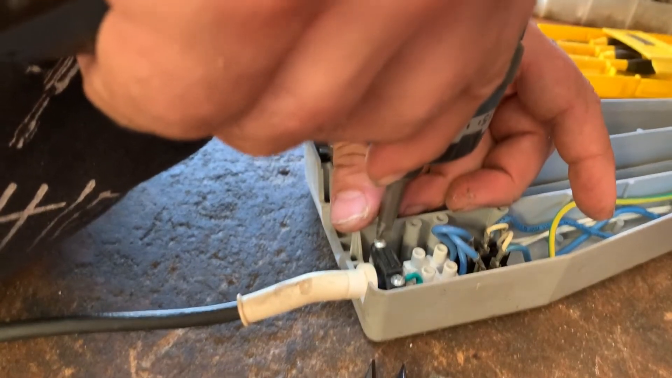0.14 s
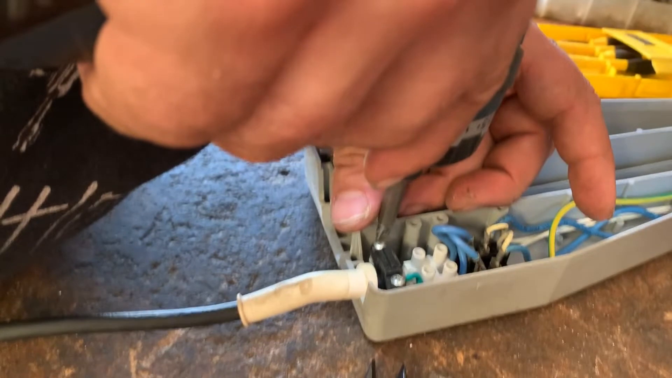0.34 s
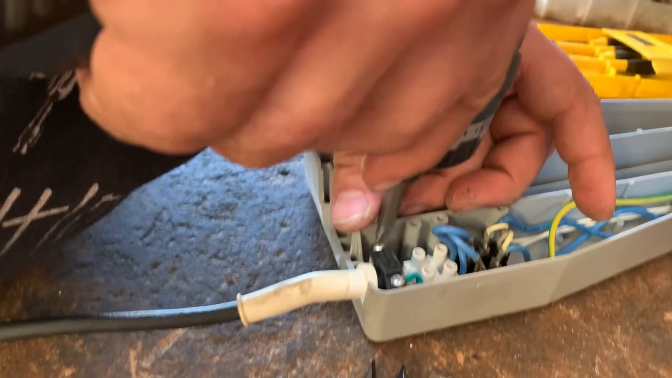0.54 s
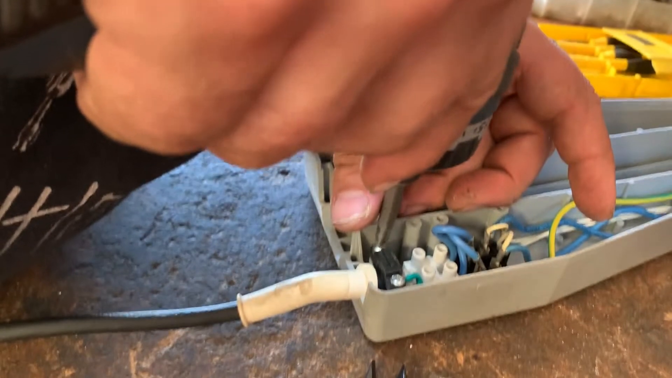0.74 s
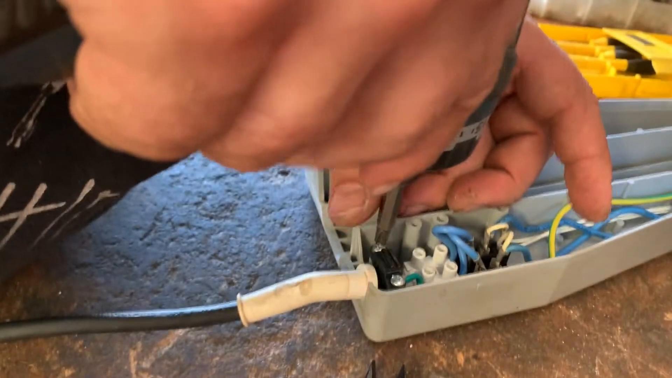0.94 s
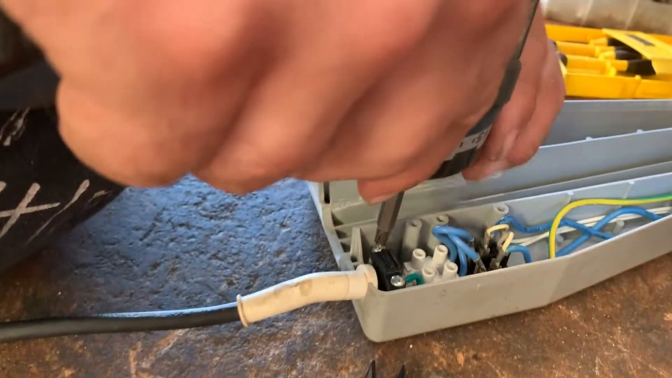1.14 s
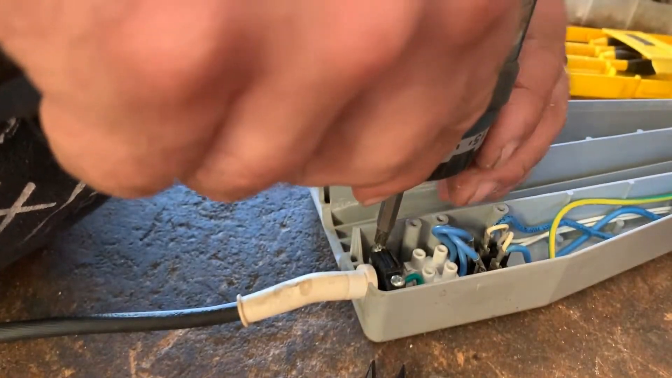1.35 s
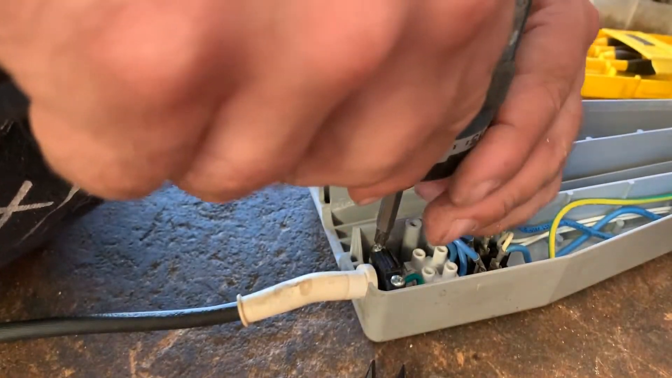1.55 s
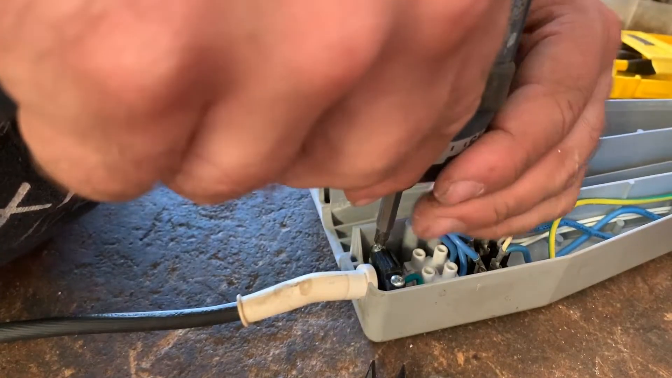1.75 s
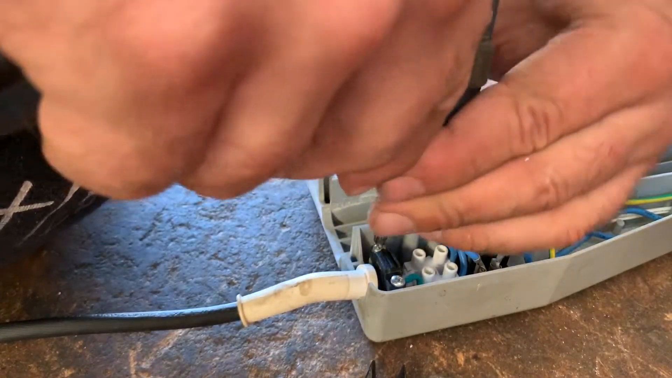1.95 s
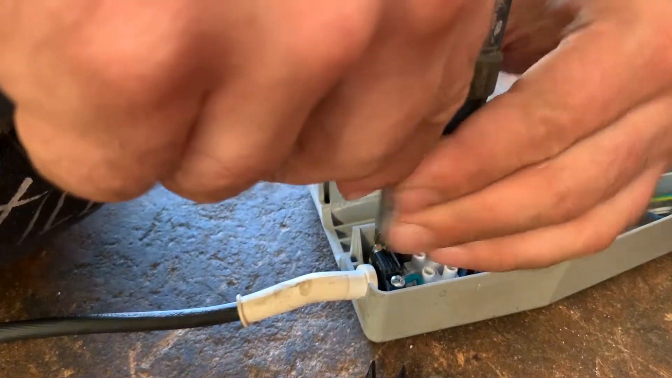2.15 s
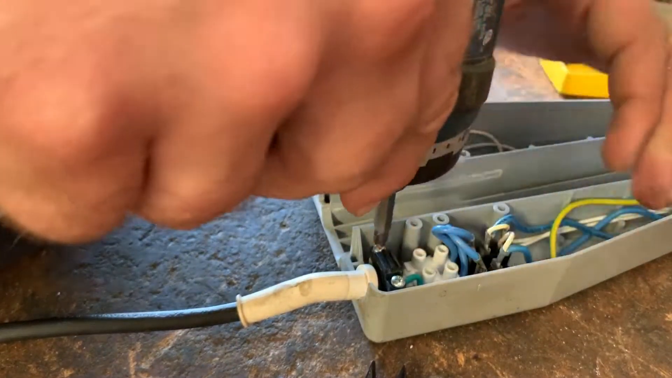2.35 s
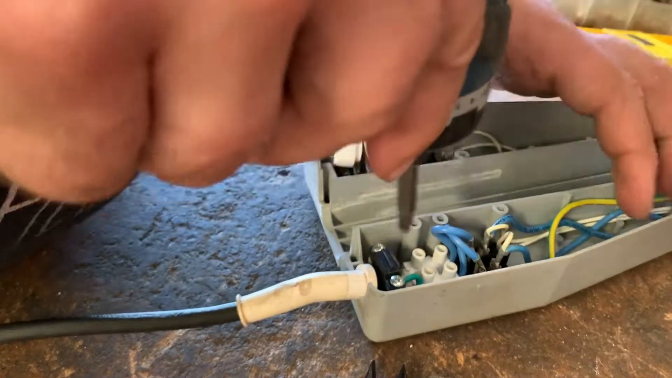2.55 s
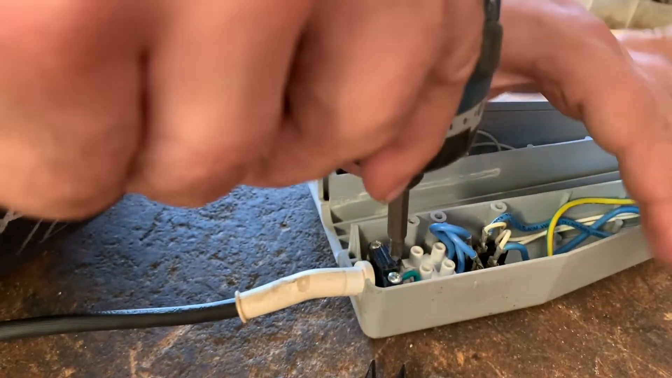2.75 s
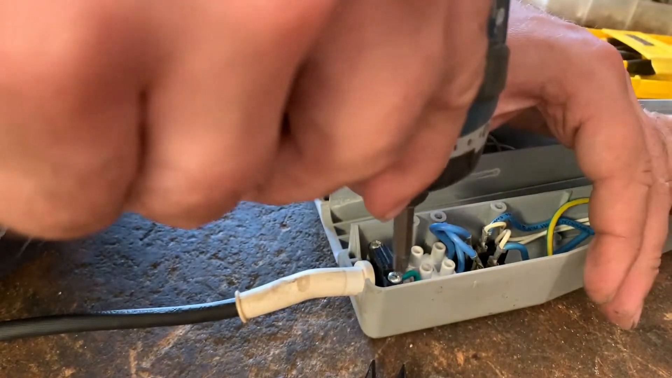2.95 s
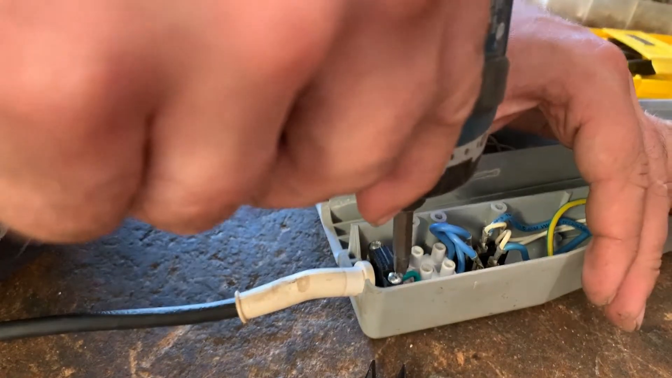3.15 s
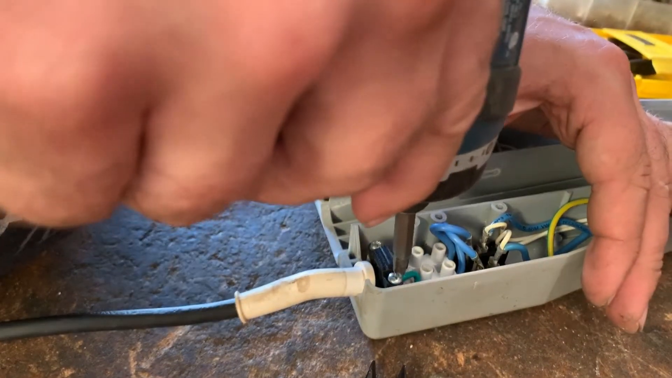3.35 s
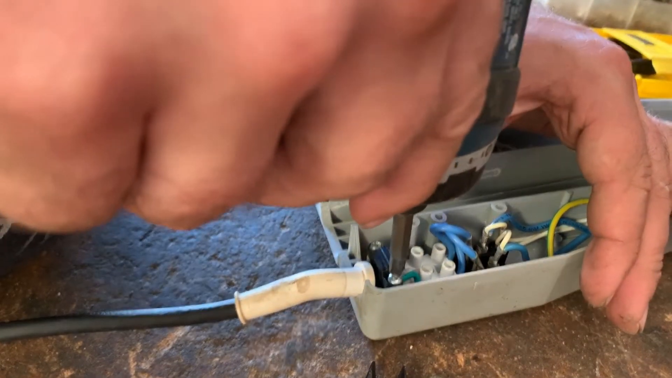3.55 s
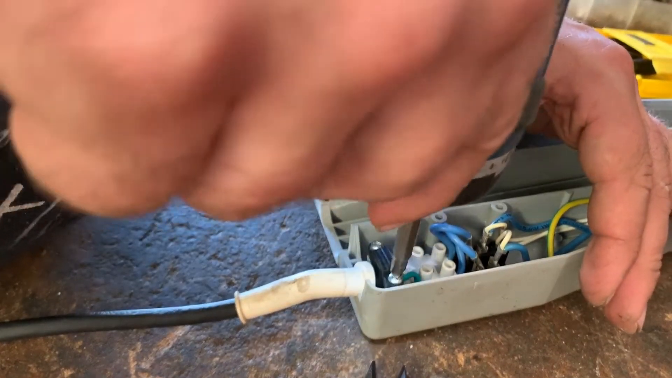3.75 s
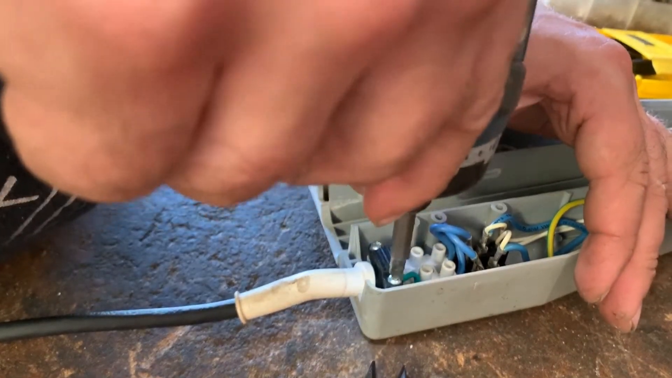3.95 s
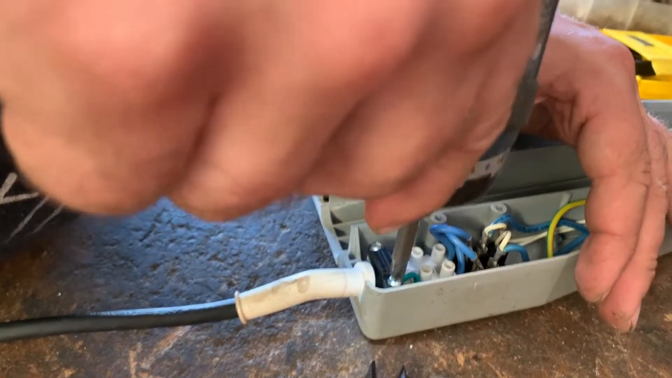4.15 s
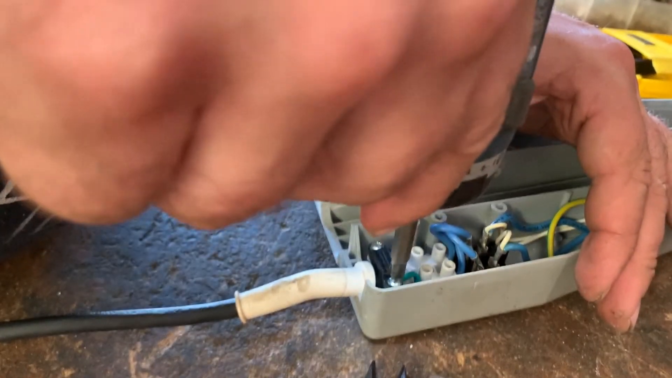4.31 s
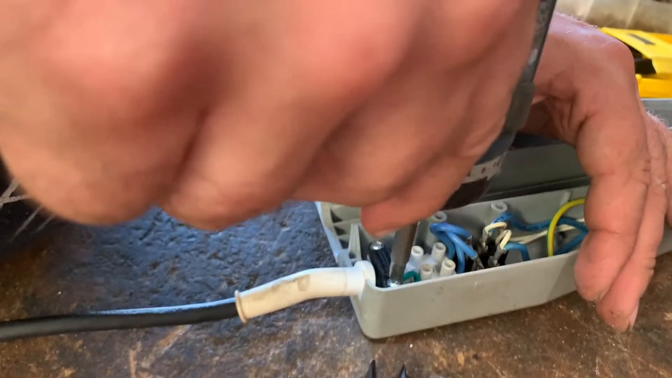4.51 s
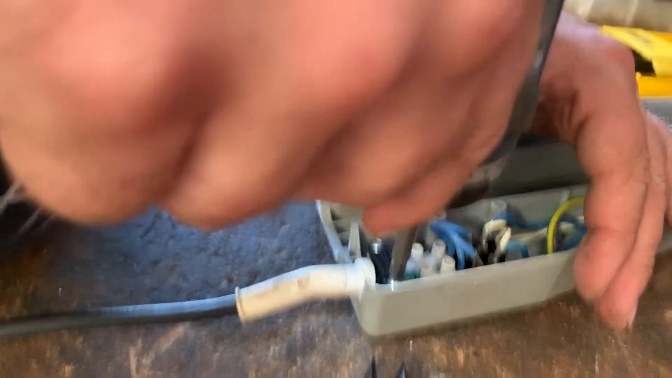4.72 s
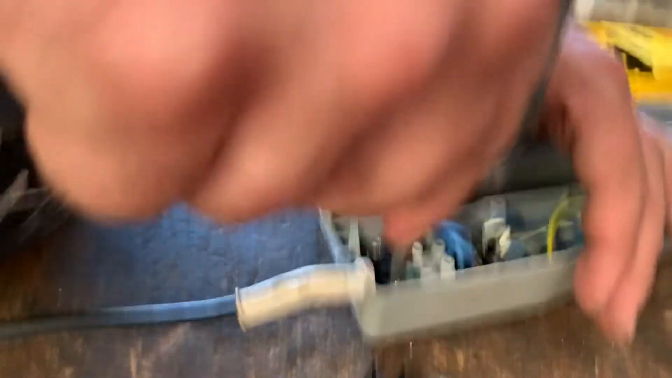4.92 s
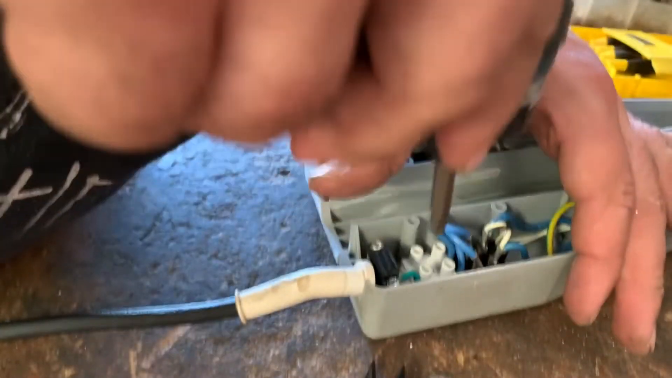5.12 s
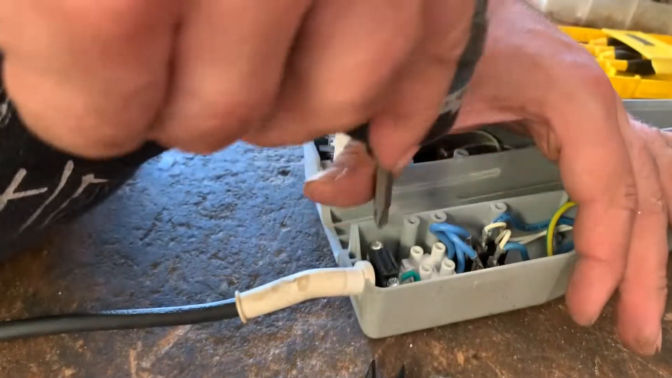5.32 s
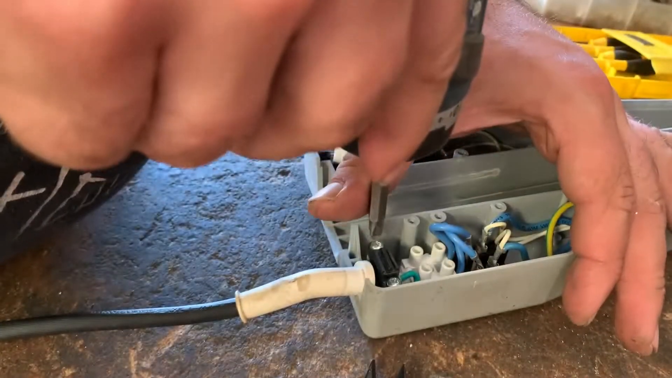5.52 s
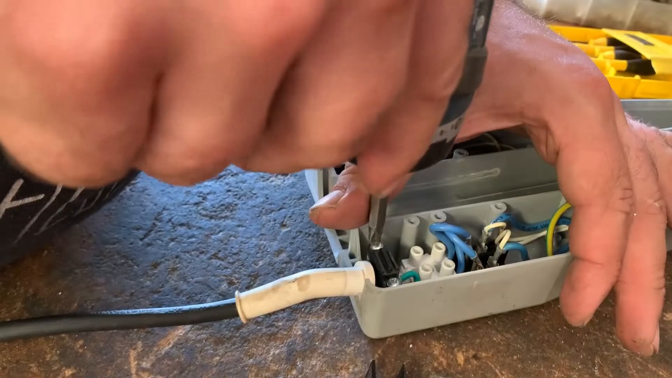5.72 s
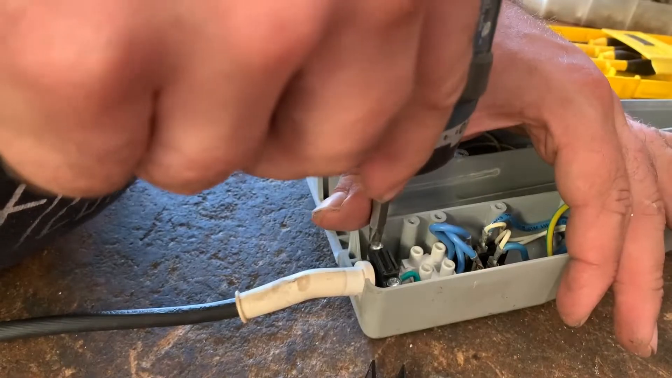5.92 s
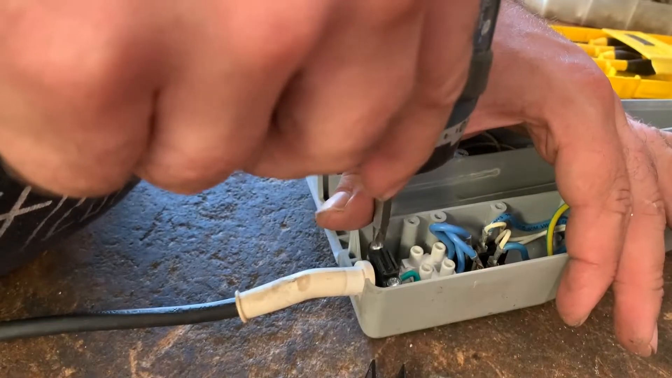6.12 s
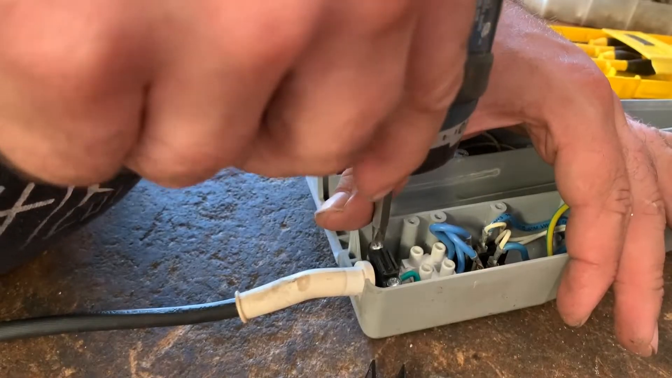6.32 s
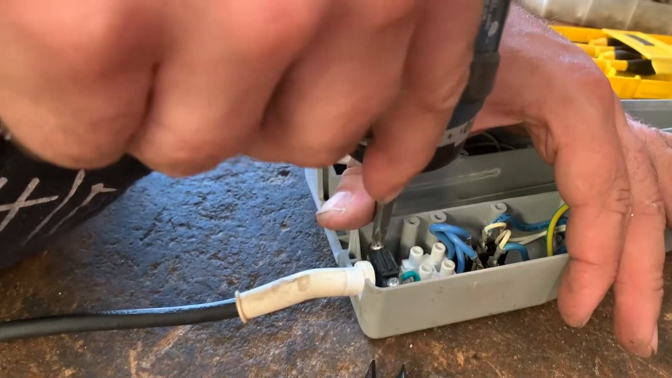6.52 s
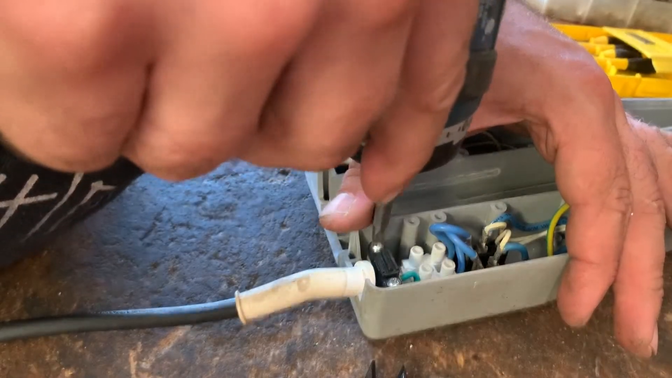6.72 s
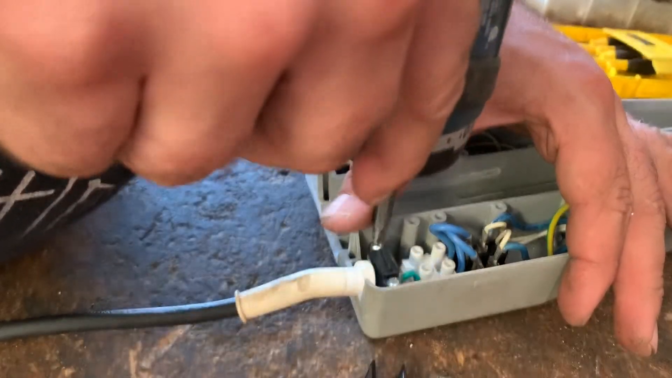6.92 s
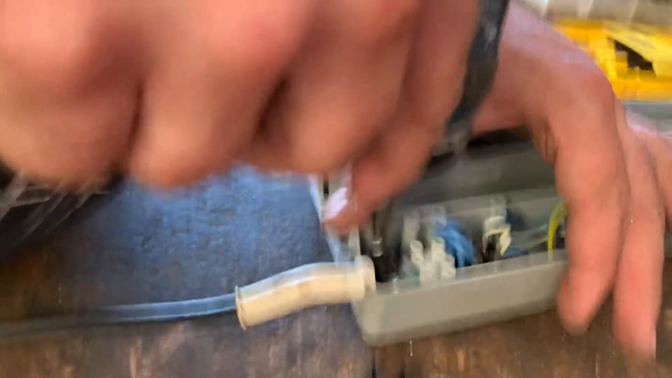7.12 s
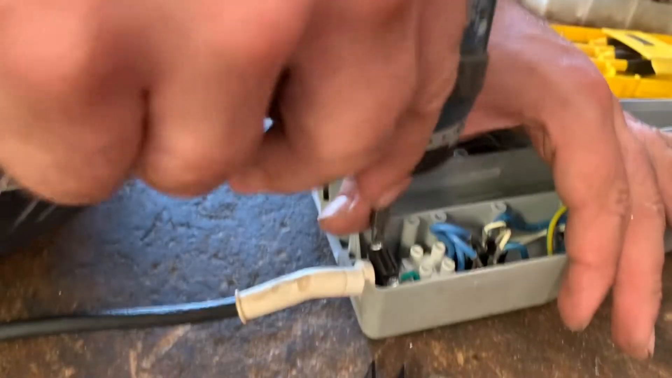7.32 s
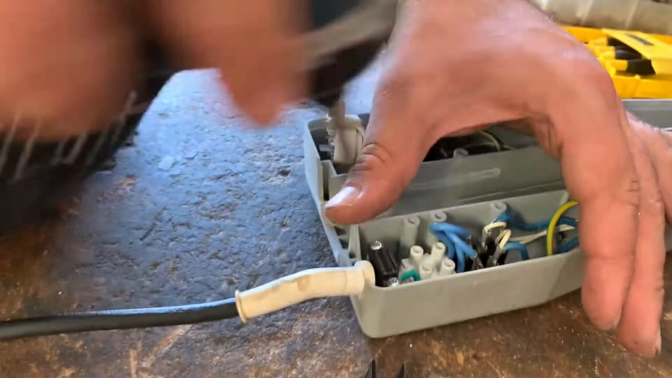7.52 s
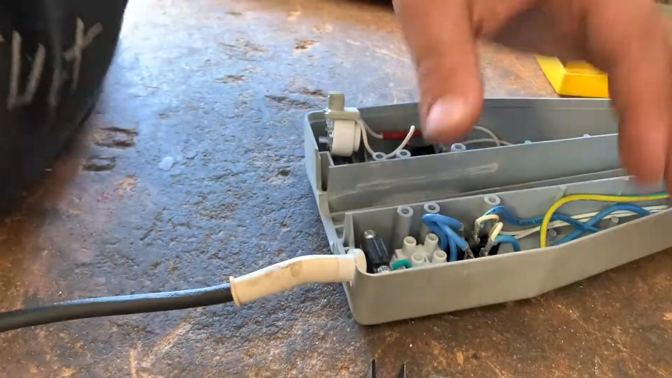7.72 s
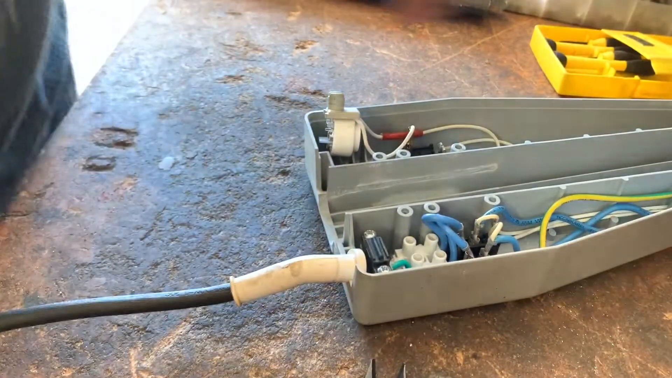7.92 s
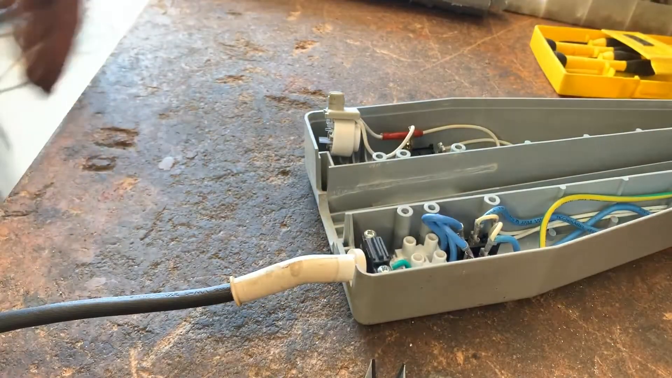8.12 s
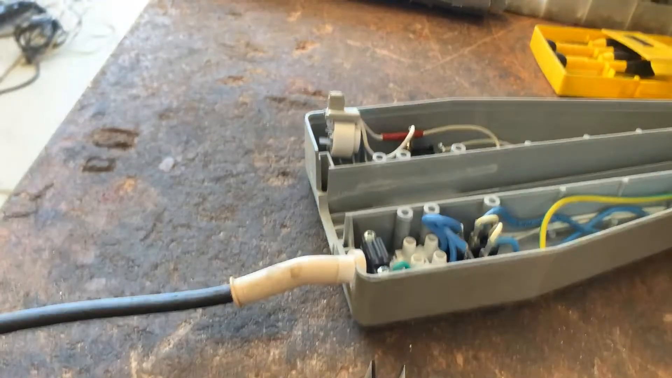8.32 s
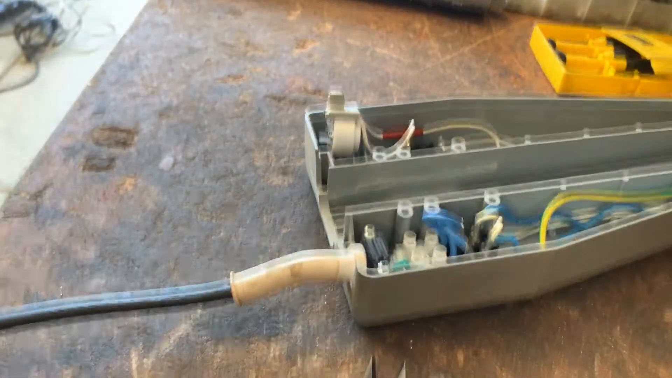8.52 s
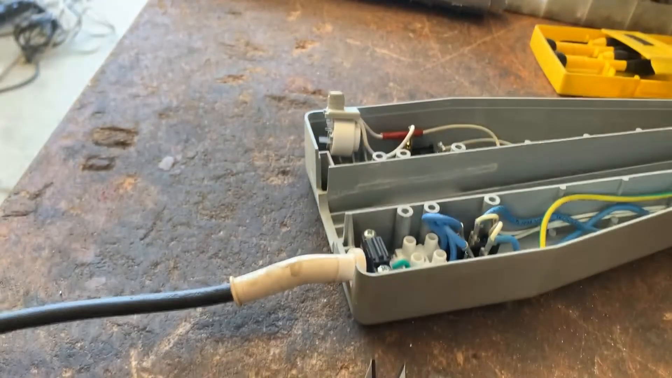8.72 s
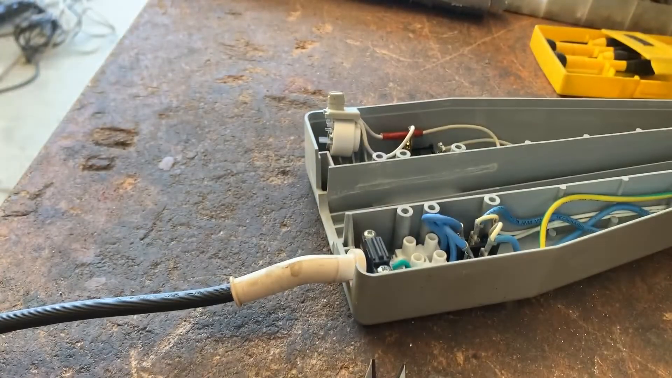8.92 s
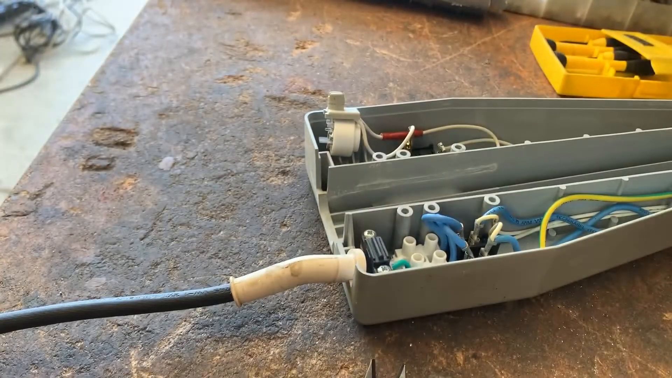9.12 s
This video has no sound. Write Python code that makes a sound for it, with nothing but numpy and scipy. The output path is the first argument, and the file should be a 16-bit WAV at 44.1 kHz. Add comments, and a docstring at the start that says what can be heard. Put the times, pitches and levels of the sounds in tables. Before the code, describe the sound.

Close, dry sound in a small workshop: a cordless driver is already whirring, gritty and slowing, and ends in a couple of sharp cracks with thumps. Light metallic ticks and sleeve brushes follow. A second burst ends in a rapid run of bit-slip clacks, a third stutters through hard knocks. Finally the plastic case knocks on the bench, leaving low room noise.

```python
"""Cordless driver on a plastic case

A small cordless driver runs in three bursts on the screws of a case that lies on a workbench: noise for its gears,
sine tones for motor and shaft. When a screw is tight the bit jumps out of its head and thumps case and bench, as noise
cracks and ringing modes. Mostly between bursts the bit ticks on plastic, the case knocks on the bench and sleeves
rustle, over workshop noise and hum. A phone nearby has two ports: their likeness, balance and phase vary with pitch."""
import sys
import numpy as np
from scipy import signal
from scipy.fft import rfft, irfft, next_fast_len
from scipy.io import wavfile
from scipy.ndimage import uniform_filter1d, map_coordinates

SR = 44100
rng = np.random.default_rng(int(sys.argv[2]) if len(sys.argv) > 2 else 0)


def to_wav(sig):
    """Store sig (one row per channel, or 1-D mono) as 16-bit WAV at the path in sys.argv[1].

    Samples outside -1..1 are clipped; the rate is SR.
    """
    pcm = np.clip(np.atleast_2d(sig), -1, 1) * 32767
    pcm = np.round(pcm).astype(np.int16)
    wavfile.write(sys.argv[1], SR, pcm.T)  # frames by channels


N = 408361  # length in samples

# How the case on the bench rings. Each row: pitch in Hz, relative level in dB, time to fall 60 dB when free in seconds.
BENCH_MODES = [(78, -12, 0.21), (107.4, 2.5, 0.13), (153.8, 4.5, 0.12), (207, 2.5, 0.06), (248.4, 5, 0.047),
               (308.6, -2, 0.044), (344.7, -0.5, 0.034), (460, -12, 0.036), (562, -11, 0.033),
               (766, -13.5, 0.031), (952, -21, 0.015)]
# How the steel bit, the chuck and the case wall ring. Each row: pitch in Hz, width in Hz, relative level in dB.
BIT_MODES = [(770, 260, -2), (1246, 194, 2.5), (1460, 280, 0.5), (1830, 300, 0), (2050, 200, 0.5),
             (2566, 300, 2), (2872, 193, 6), (3760, 600, -2), (4430, 410, -0.5), (4800, 180, 1.5),
             (5410, 320, -2.5), (6220, 360, -2.5), (6990, 380, -1), (8600, 1000, 0), (10900, 980, -2.5),
             (11680, 510, -2), (14380, 850, -4)]
HELD = 0.83  # a hand on the case shortens its ring to this share


def amp(db):
    """Turns decibels into a gain."""
    return 10 ** (np.asarray(db) / 20)


def unit(x):
    """Scales a sound to an rms level of 1."""
    return x / np.sqrt(np.mean(x ** 2) + 1e-20)


def along(points, hz):
    """Reads a curve of (Hz, value) points, with pitch on a log axis."""
    f, v = np.transpose(points)
    return np.interp(np.log(hz + 1), np.log(f + 1), v)


def curves(rows):
    """Gives one value per sample for each column after the time."""
    s, *cols = np.transpose(rows)
    return [np.interp(np.arange(N) / SR, s, c) for c in cols]


def wobble(rate):
    """Draws a smooth random curve through this many random points a second."""
    points = rng.standard_normal(int(N * rate / SR) + 4)
    return map_coordinates(points, [np.arange(N) * rate / SR])


def filtered(x, response):
    """Filters x by a complex response that depends on frequency."""
    m = next_fast_len(x.shape[-1] + 8192)  # spare room, so that the end does not wrap to the start
    spectrum = rfft(x, m) * response(np.fft.rfftfreq(m, 1 / SR))
    return irfft(spectrum, m)[..., :x.shape[-1]]


def resonances(modes):
    """Sums resonances of (Hz, width in Hz, dB), with alternating sign; each rings after it is struck."""
    def response(f):
        return sum((-1) ** k * amp(db) * 1j * f * width / (hz * hz - f * f + 1j * f * width)
                   for k, (hz, width, db) in enumerate(modes))
    return response


def noise(spectrum):
    """Makes two unrelated noises of one colour, silent outside the spectrum."""
    def colour(hz):
        inside = (hz > spectrum[0][0]) & (hz < spectrum[-1][0])
        return amp(along(spectrum, hz)) * inside
    return unit(filtered(rng.standard_normal((2, N)), colour))


def patchy(x, depth_db):
    """Lets bands a few hundred Hz wide swell and sink by themselves."""
    z = signal.stft(x, nperseg=512)[2]
    field = uniform_filter1d(rng.standard_normal(z.shape[1:]), size=3, axis=0)  # smooth over pitch
    field = uniform_filter1d(field, size=5, axis=1)  # smooth over time
    return signal.istft(z * amp(depth_db * unit(field)), nperseg=512)[1][:, :N]


def add(track, s, sound):
    """Mixes a sound in at s seconds."""
    part = track[..., round(s * SR):][..., :sound.shape[-1]]
    part += sound[..., :part.shape[-1]]


def workshop_air():
    """The broad background is coloured noise whose bands shift a little in level."""
    # Colour of the background. Each row: pitch in Hz, relative level in dB per Hz.
    air_colour = [(15, -49), (25, -34.5), (44, 6), (66, 8), (82, -5.5), (260, -9.5), (286, -21), (356, -11),
                  (576, -25), (635, -26.5), (848, -18), (1300, -19), (1620, -26), (2000, -19.5),
                  (2800, -22.5), (8000, -39), (10400, -54.5), (17600, -120)]
    air_db = -42
    return amp(air_db + wobble(7)) * unit(patchy(noise(air_colour), 1.5))


def machine_hum():
    """Distant machines hum as noise passed through narrow resonances, so each hum wavers."""
    # Each row: pitch in Hz, width in Hz, level in dB.
    hums = [(57.6, 2.4, -58.5), (120.3, 5.6, -52), (165.1, 3.9, -55), (264, 0.43, -57), (329, 3.2, -67.5),
            (573, 7.5, -63)]
    hum = np.zeros((2, N))
    for hz, width, db in hums:
        hum += amp(db) * unit(filtered(rng.standard_normal((2, N)), resonances([(hz, width, 0)])))
    return hum


def cloth_rustle():
    """Sleeves and fingers brush the case: flickering noise swells and fades over a faint steady rustle."""
    # Colour of the rustle. Each row: pitch in Hz, relative level in dB per Hz.
    cloth_colour = [(2500, -25), (5000, -6), (10000, 0), (12300, -3), (13000, -16), (15900, -32)]
    # The brushes. Each row: middle in seconds, length in seconds, level in dB at the middle.
    brushes = [(1.108, 0.59, -79), (1.56, 0.15, -59.5), (1.94, 0.23, -54), (2.213, 0.084, -62),
               (2.551, 0.093, -51), (3.158, 0.06, -63), (3.502, 0.033, -41), (5.067, 0.18, -59),
               (5.66, .12, -73), (6.154, 0.036, -53), (6.394, 0.083, -68), (7.381, 0.08, -45.5),
               (7.708, 0.22, -63), (7.89, 0.26, -61), (8.37, 0.34, -63), (8.536, 0.073, -64)]
    steady_db = -73
    t = np.arange(N) / SR
    strength = amp(steady_db)
    for s, length, db in brushes:
        strength = strength + amp(db) * np.cos(np.pi * np.clip((t - s) / length, -.5, .5)) ** 2
    return strength * unit(noise(cloth_colour) * amp(2.7 * wobble(40)))


def knocking(turns):
    """A flank of the bit takes up its play and gives one short push; case and bit ring briefly."""
    # What the knocks ring, first the case and then the bit. Each row: pitch in Hz, width in Hz, relative level in dB.
    knock_body = [(175, 75, 0), (1650, 200, -18)]
    knocks_per_turn, scatter_db = 6, 1.8
    count = np.floor(knocks_per_turn * turns + .5 + .08 * wobble(20))  # the timing is a little uneven
    pushes = (np.diff(count, prepend=count[0]) > 0) * amp(scatter_db * wobble(28))
    low, high = (resonances([mode]) for mode in knock_body)
    return filtered(pushes, lambda f: low(f) ** 2 + high(f))


def driver():
    """Gear noise beats with the shaft, motor tones waver, rumble swells once a chuck turn with small knocks."""
    # One list per burst. Each row: time in seconds, commutator rate in Hz, gear noise level in dB.
    bursts = [
        [(0, 958.5, -28.5), (.5, 959, -29), (.6, 932, -29.5), (.62, 908, -27.5), (.72, 870, -28),
         (.86, 859, -29), (.92, 825, -30.5), (.96, 780, -42)],
        [(3.86, 516, -39), (3.9, 675, -31.5), (3.935, 810, -29), (3.975, 841, -29.5), (4.04, 851, -29),
         (4.17, 853, -29), (4.22, 874, -30), (4.31, 829.5, -30.5), (4.5, 822, -29.5), (4.57, 797, -31),
         (4.63, 754, -29), (4.72, 797, -28.5), (4.95, 764, -29), (4.97, 750, -57)],
        [(6.545, 704, -43), (6.6, 737, -31.5), (6.63, 679, -34), (6.665, 533, -35.5), (6.69, 488, -39),
         (6.74, 492, -29.5), (6.755, 590, -32.5), (6.79, 698, -35), (6.83, 656, -34.5), (6.88, 600, -42),
         (6.96, 550, -52), (6.99, 600, -29.5), (7.1, 648, -32), (7.2, 660, -39.5), (7.285, 574, -51.5)],
    ]
    # Each row is a burst: whine level in dB, second commutator tone in dB, fainter tones in dB over their table,
    # time the screw is seated in seconds, bench rumble in dB, its swing with the chuck in dB,
    # first swell in seconds after the start.
    work = [(-46.5, -43.5, 1, 0.8, -37, 4.5, .065), (-42.5, -43.5, -3, 4.59, -40, 2, 0.18),
            (-52, -46.5, -2, 6.7, -40.5, 2, 0.039)]
    # Gear noise through the housing, which the hand covers differently in each burst: one list per burst.
    # Each row: pitch in Hz, relative level in dB per Hz.
    housings = [
        [(350, -10), (600, -12), (1700, -6.5), (2800, -9), (3300, -14.5), (5500, -9), (6500, -7.5),
         (8000, -4.5), (8800, -10.5), (9600, -3), (11500, -8), (12500, -8.5), (13500, -14), (15800, -15)],
        [(350, -48), (600, 0.5), (1700, -2), (2500, -3.5), (3600, -8), (5500, -3.5), (7000, 3.5), (8300, -0.5),
         (9300, 0), (11300, -2), (12600, -4), (13500, -4), (14300, -25.5), (15800, -3.5)],
        [(350, -2), (600, -1), (1700, 1.5), (3300, -3.5), (5500, -3.5), (7000, 5), (8500, -1), (10800, 0.5),
         (13000, -4.5), (15800, -31)],
    ]
    # Level in dB of the switching whistle in each burst.
    whistle_levels = [-61, -51, -58]
    # Level in dB over the rumble of the small knocks in each burst.
    knock_levels = [-1, -7, -8]
    # The fainter tones. Each row: times the shaft speed, level in dB over the whine.
    faint_tones = [(3, -7), (7.5, -10), (10.4, -2), (12.2, -8), (15, -6), (20, -9), (25, -6), (30, -8),
                   (35, -5), (40, -1), (45, -5)]
    switching_hz = 15531  # the speed control chops the current here
    bars_per_turn = 5  # commutator bars a turn of the shaft
    whine_order = 5.155  # a gear mesh whines just above the commutator rate, times the shaft speed
    load_db_per_loss = 51  # the second commutator tone gains this times the lost share of top speed
    seated_db, seated_s = -22, 0.05  # a tight screw smothers the tones this much within this time
    turns_per_bar = 0.00515  # chuck turns for each commutator bar
    rumble_growth = 1.1  # rumble dB per dB of gear noise
    stall_hz, stall_span_hz = 510, 40  # the tones die as the motor stalls to this rate, within this span

    out, t = np.zeros((2, N)), np.arange(N) / SR
    bench = resonances([(hz, 3 / t60, db) for hz, db, t60 in BENCH_MODES[1:4]])
    shaking = unit(filtered(rng.standard_normal((2, N)), bench) * amp(2.9 * wobble(28)))
    waver = [amp(3 * wobble(20)) for _ in faint_tones]

    for rows, settings, housing, whistle_db, knock_db in zip(bursts, work, housings, whistle_levels, knock_levels):
        hz, gear_db = curves(rows)
        whine_db, second_db, faint_db, seated_at, rumble_db, swing_db, swell_s = settings
        start, end = rows[0][0], rows[-1][0]
        on = np.clip((t - start + 0.012) / 0.00216, 0, 1) * amp(-400 * np.maximum(t - end, 0))
        effort_db = gear_db - np.median(gear_db[on > .5])
        seated = np.clip((t - seated_at) / seated_s, 0, 1)

        # Angles in radians; the shaft speed jitters slightly
        shaft = 2 * np.pi * np.cumsum(hz * (1 + .0035 * wobble(150))) / SR / bars_per_turn
        bars = np.cumsum(hz) / SR
        chuck = 2 * np.pi * turns_per_bar * (bars - np.interp(start + swell_s, t, bars))

        beat = 1 + .15 * np.sin(shaft)
        gears = unit(patchy(noise(housing), 2.6) * beat * amp(1.2 * wobble(90)))

        whine = amp(2.5 * wobble(45)) * np.sin(whine_order * shaft)
        faint = sum(amp(db) * size * np.sin(times * shaft) for (times, db), size in zip(faint_tones, waver))
        lost_speed = np.clip(1 - hz / np.maximum.accumulate(hz), 0, .12)
        second_gain = amp(second_db + load_db_per_loss * lost_speed + 2.4 * wobble(45))
        second = second_gain * np.sin(2 * bars_per_turn * shaft)
        tones = amp(whine_db) * (whine + amp(faint_db) * faint) + second
        turning = np.clip((hz - stall_hz) / stall_span_hz, 0, 1)
        tones = amp(effort_db + seated_db * seated) * turning * tones
        whistle = amp(whistle_db + effort_db + 1.5 * wobble(25)) * np.sin(2 * np.pi * switching_hz * t)

        knocks = knocking(chuck / (2 * np.pi))
        knocks = amp(knock_db) * knocks / np.std(knocks[on > .5])
        swell = amp(rumble_db + rumble_growth * effort_db + swing_db * np.cos(chuck))
        out += on * (amp(gear_db) * gears + swell * (shaking + knocks))
        out += on * np.sqrt(2) * (tones + whistle)
    return out


def thump(db, tilt_db, delay, soft, held=1, swing=2.6, centre_hz=200, focus_db=0):
    """A blow rings the bench modes at new strengths, and loose parts of the case clatter in the upper ones.

    tilt_db is per octave above centre_hz; focus_db is lost one octave from it; soft is the rise in seconds;
    held shortens the ring; swing is how much wider the first swing is. db is the level of the first 25 ms."""
    lag_cycles = 0.46  # each mode needs about this many cycles to build up
    first_s = .011  # the wide first swing settles within about this time
    t = np.maximum(np.arange(SR // 3) / SR - delay, 0)
    first = slice(SR // 40)
    ring, modes = 0, []
    for hz, level, t60 in BENCH_MODES:
        octaves = np.log2(hz / centre_hz)
        level = level + tilt_db * octaves - focus_db * octaves ** 2
        modes.append((hz, 0.45 * hz, level))
        fade = amp(level + rng.normal(0, 3.5, (2, 1)) - 60 * t / (held * t60))
        build_up = 1 - np.exp(-t * hz / lag_cycles)
        ring = ring + fade * build_up * np.sin(2 * np.pi * hz * rng.normal(1, 0.032, (2, 1)) * t)
    ring = ring * (1 + swing * np.exp(-t / first_s)) / np.std(ring[0, first])

    shake = rng.standard_normal(ring.shape) * amp(-60 * t / 0.053) * (t > 0)
    clatter = filtered(shake, resonances(modes[4:]))
    both = ring + amp(-9.5) * clatter / np.std(clatter[0, first])
    both = both * (1 - np.exp(-t / soft))
    return amp(db) * both / np.std(both[0, first])


def crack(db, t60, rise, colour):
    """A dying burst of noise with ragged strength, coloured by what is struck; db is its peak."""
    t = np.arange(SR // 8) / SR
    steps = np.repeat(rng.standard_normal(len(t) // 40 + 1), 40)[:len(t)]
    envelope = amp(0.99 * steps) * amp(-60 * t / t60) * (1 - np.exp(-t / rise)) ** 2
    burst = filtered(rng.standard_normal((2, len(t))) * envelope, colour)
    return amp(db) * burst / np.abs(burst).max(axis=1, keepdims=True)


def bit_jumps(out):
    """The bit jumps in the screw head: the steel cracks just before the bench answers."""
    # Each row: time in seconds, crack peak in dB, thump level in dB, crack tilt in dB per octave,
    # delay of the thump in seconds.
    jumps = [(0.7973, -8, -16.5, -2, 0.003), (0.8785, -17.5, -15.5, -4.5, 0.0029),
             (0.94, -39, -28, 2, 0.0034), (4.191, -5, -12, 1, 0.0022), (4.642, -6, -13.5, -1, 0.0034),
             (4.7055, -13, -16, -12, 0.0094), (4.769, -8, -17.5, -0.5, 0.002),
             (4.8253, -5.5, -16.5, -1.5, 0.0017), (4.8805, -14.5, -18.5, -2.5, 0.0061),
             (4.9434, -21.5, -19, -1, 0.0025), (6.592, -20, -29.5, -1.5, 0.0042),
             (6.7341, -5.5, -14.5, 1.5, 0.00368), (6.8167, -5.5, -14, 0.5, 0.003),
             (6.9712, -6.5, -14.5, 1, 0.0042), (7.0562, -1.5, -13.5, -0.5, 0.0036),
             (7.121, -5.5, -13.5, 0.5, 0.0036), (7.2309, -12.5, -14.5, -0.5, 0.004)]
    crack_t60 = 0.039  # seconds
    full_tilt_db, tilt_growth = 3, 0.73  # thump tilt per octave at full force, its fall per dB of weaker crack
    pressed = 0.79  # the bit pressing on the case shortens its ring to this share
    hardest_db = np.max(jumps, axis=0)[1]
    for s, db, thump_db, tilt_db, delay in jumps:
        steel = resonances([(hz, width, level + tilt_db * np.log2(hz / 2800) + rng.normal(0, 3.0))
                            for hz, width, level in BIT_MODES])
        add(out, s - .002, crack(db, crack_t60, 0.0032, steel))
        thump_tilt_db = full_tilt_db + tilt_growth * (db - hardest_db)
        add(out, s, thump(thump_db, thump_tilt_db, delay, .0015, pressed))


def bit_ticks(out):
    """Handling ticks have one broad colour each and ring the steel; higher ticks die sooner."""
    # Each row: time in seconds, tick peak in dB, centre pitch in Hz, width over centre, thump level in dB.
    tick_list = [(1.028, -39, 1800, .8, -45), (1.32, -31.5, 2830, 3.4, -48), (1.817, -28, 5000, 6.1, -47.5),
                 (1.823, -34, 5000, 3, -57), (1.85, -27, 6000, 3.2, -43), (1.8569, -13.5, 10000, 1.7, -43),
                 (1.8771, -22, 4300, 3.8, -48), (1.888, -14, 12070, 1.5, -44), (1.914, -36, 4400, 1.5, -63),
                 (1.931, -16, 10000, 2.1, -44), (1.961, -31, 4000, 3, -60),
                 (1.9764, -15.5, 10000, 1.8, -56), (2.1, -37, 1500, 1.6, -47),
                 (2.398, -31.5, 2930, 2.7, -60), (2.4031, -27.5, 2010, 1.5, -42),
                 (2.435, -20.5, 1450, 9, -36), (2.442, -22, 2050, 2.7, -51), (2.5323, -29, 1600, 1.9, -43),
                 (2.558, -26, 1090, 1.5, -54), (2.566, -36, 2000, 1.8, -39), (2.614, -43, 9000, 1.2, -48),
                 (3.109, -36, 1780, 1.5, -52), (3.153, -20.5, 2800, 1.7, -41),
                 (3.162, -40, 11500, 2.2, -59), (3.478, -37, 2700, 0.73, -48), (3.495, -27.5, 1770, 1, -52),
                 (3.5005, -19, 1750, 2.4, -38.5), (3.7766, -24, 6740, 0.48, -70),
                 (5.033, -29.5, 2900, 1.6, -42), (5.055, -28, 9000, 2.2, -47.5),
                 (5.072, -29, 10000, 1.5, -63), (5.086, -26.5, 2650, 2.8, -38.5),
                 (5.11, -40, 7000, 1.5, -62), (5.186, -37, 9500, 3, -45), (5.336, -32, 10500, 2.8, -44),
                 (5.629, -32.5, 1300, 3, -37.5), (5.6417, -27.5, 1840, 2.3, -45),
                 (5.687, -23.5, 3730, 1.6, -39), (6.132, -32, 2500, 2, -54), (6.1373, -19, 3000, 4.4, -42),
                 (6.148, -29, 2850, 2.2, -43.5), (6.157, -38, 2850, 1.8, -50), (6.368, -20, 1920, 3.6, -32),
                 (6.417, -40, 9000, 2.2, -72), (6.428, -21.5, 7100, 0.96, -64),
                 (6.905, -19.5, 7040, 2.3, -41), (7.274, -26.5, 8200, 1.2, -42), (7.36, -27, 1300, 13, -46),
                 (7.3894, -29.5, 3800, 2.9, -48), (7.661, -39.5, 9000, 2, -47.5),
                 (7.6941, -33.5, 1170, 6.3, -47), (7.77, -40, 9000, 1.4, -63),
                 (8.2862, -26.5, 1130, 1.4, -54), (8.2974, -27, 1380, 0.74, -42),
                 (8.3213, -51, 2000, 1.5, -54), (8.3694, -21, 3430, 4.5, -30),
                 (8.384, -21.5, 3370, 2.6, -46), (8.386, -18, 755, 0.43, -50), (8.398, -32, 900, 1.8, -44),
                 (8.513, -36.5, 6600, 1.7, -54), (8.5275, -34.5, 3620, 0.49, -55),
                 (8.6384, -32, 3780, 2.9, -49)]
    longest_t60, longest_hz, shortening = 0.046, 1980, 0.58  # seconds up to this pitch, then this power of pitch
    for s, db, hz, width, thump_db in tick_list:
        steel = resonances([(mode, wide, level + rng.normal(0, 3)) for mode, wide, level in BIT_MODES])
        colour = resonances([(hz, width * hz, 0)])
        t60 = longest_t60 * min(1, longest_hz / hz) ** shortening
        add(out, s, crack(db, t60, 0.0056 * t60, lambda f: colour(f) ** 2 * steel(f)))
        add(out, s, thump(thump_db, 8, 0.00054, 0.024, HELD))


def case_knocks(out):
    """The case knocks on the bench: duller blows that ring most the modes near one pitch."""
    # Each row: time in seconds, thump level in dB, favoured pitch in Hz, share of the free ring time.
    knock_list = [(2.2278, -38.5, 230, 0.81), (2.558, -34, 330, 0.55), (2.595, -38, 300, .8),
                  (3.1632, -31, 109, 0.82), (3.506, -31, 99, 0.55), (8.3222, -21.5, 215, 0.55),
                  (8.343, -33, 170, 0.36), (8.384, -24.5, 300, 0.4), (8.509, -28, 248, 0.43)]
    for s, db, hz, share in knock_list:
        add(out, s, thump(db, 0, 0.00048, 0.0051, share, swing=0.6, centre_hz=hz, focus_db=9))


def trigger_snaps(out):
    """The trigger snaps in: a click around one pitch, then a soft thump of the case."""
    # Each row: time in seconds, click peak in dB, thump level in dB.
    snaps = [(3.8606, -16.5, -30.5), (6.555, -19, -34)]
    click_hz, click_width_hz, click_t60 = 1010, 1230, 0.023
    click = resonances([(click_hz, click_width_hz, 0)])
    for s, db, thump_db in snaps:
        add(out, s, crack(db, click_t60, 0.00024, lambda f: click(f) ** 2))
        add(out, s, thump(thump_db, 0, 0.0027, 0.014, HELD))


def walls(x):
    """The room answers with a noise tail in which each frequency dies at its own speed."""
    # Each row: pitch in Hz, time to fall 60 dB in seconds.
    fall_times = [(100, 0.47), (1000, 0.13), (5000, 0.18), (15000, 0.12)]
    hz, t, z = signal.stft(rng.standard_normal((2, SR // 2)), SR, nperseg=256)
    tail = signal.istft(z * amp(-60 * t / along(fall_times, hz)[:, None]), SR, nperseg=256)[1]
    late = np.pad(x, ((0, 0), (300, 0)))  # the answer comes 300 samples later
    return signal.fftconvolve(late, tail / np.linalg.norm(tail[0]), axes=1)[:, :N]


def scene():
    """Each source gives a shared and an unshared part; the two ports mix them by their likeness."""
    # Each row: pitch in Hz, likeness of left and right (1 is the same).
    likeness = [(300, 0.95), (600, 0.17), (1800, 0.41), (4500, 0.2), (6200, 0.23), (7500, 0.4),
                (8400, 0.99), (9800, 0.95), (11000, 0.82), (12100, 0.37), (13300, 0.56), (14600, .9),
                (16000, 0.57)]
    near = driver()
    for strike in (bit_jumps, bit_ticks, case_knocks, trigger_snaps):
        strike(near)
    far = filtered(walls(near), lambda hz: 1 / (1 + 1j * hz / 2500))  # the walls return little treble
    parts = near + amp(-11.0) * far + workshop_air() + machine_hum() + cloth_rustle()

    def shares(hz):
        angle = np.arccos(np.clip(along(likeness, hz), 0, 1)) / 2
        return np.array([np.cos(angle), np.sin(angle)])
    shared, unshared = filtered(parts, shares)
    return np.array([shared + unshared, shared - unshared])


def record(dry):
    """Bass is cut, balance and phase vary with pitch, peaks are rounded, nothing passes above the band limit."""
    # Each row: pitch in Hz, left over right in dB.
    left_over_right = [(100, -3.5), (400, -1), (1200, -1.5), (3500, 0), (5400, -5), (7200, -1),
                       (16000, 0.5)]
    # Each row: pitch in Hz, phase lead of the right channel in radians.
    right_lead = [(0, 0), (1500, 0), (2200, -1.8), (3600, -3.3), (5700, -3.3), (6600, -5.6), (8350, -3.2),
                  (8750, -3.08), (10500, -.2), (11300, .2), (13100, 3.08), (13900, 3.2), (15600, 6.28)]
    low_cut_hz, top_hz = 52, 15780
    ceiling = .93  # the loudest peaks are rounded off here
    half = np.array([[.5], [-.5]])  # each channel takes half of the difference

    def ports(hz):
        low_cut = (1j * hz / (low_cut_hz + 1j * hz)) ** 3
        balance = amp(half * along(left_over_right, hz))
        return low_cut * balance * np.exp(-1j * half * np.interp(hz, *np.transpose(right_lead)))
    heard = filtered(dry, ports)
    rounded = heard / (1 + np.abs(heard / ceiling) ** 6) ** (1 / 6)
    return filtered(rounded, lambda hz: np.clip((top_hz - hz) / 120 + .5, 0, 1) ** 2)


dry = scene()
out = record(dry)
to_wav(out)
```